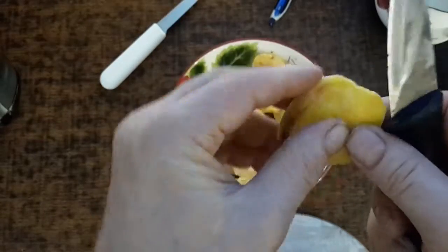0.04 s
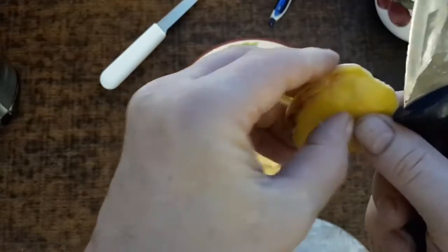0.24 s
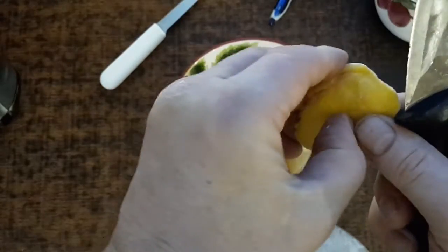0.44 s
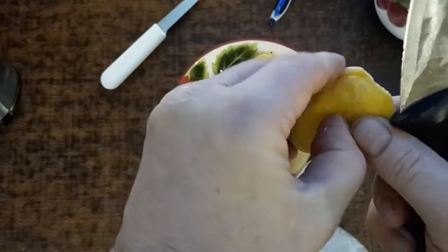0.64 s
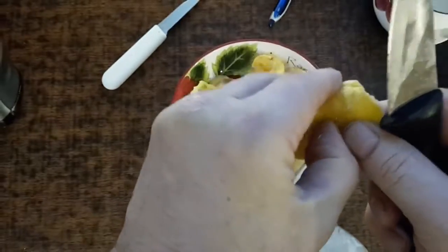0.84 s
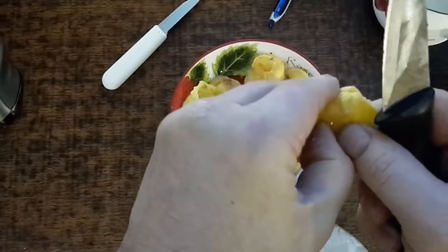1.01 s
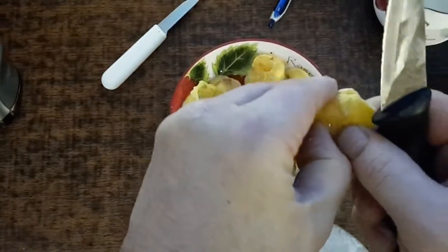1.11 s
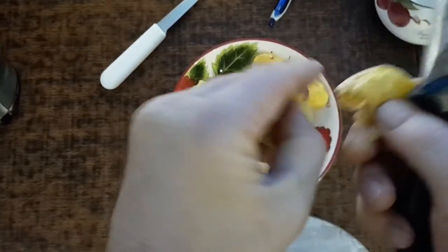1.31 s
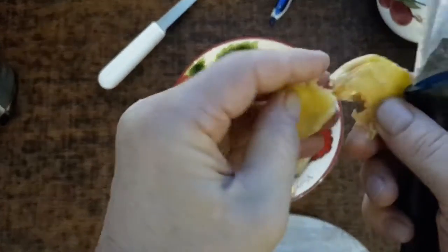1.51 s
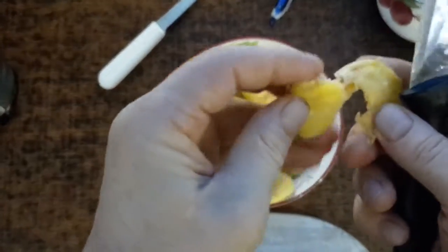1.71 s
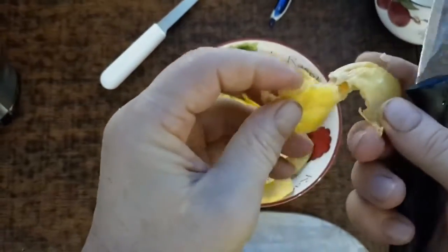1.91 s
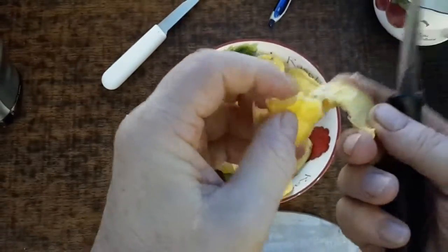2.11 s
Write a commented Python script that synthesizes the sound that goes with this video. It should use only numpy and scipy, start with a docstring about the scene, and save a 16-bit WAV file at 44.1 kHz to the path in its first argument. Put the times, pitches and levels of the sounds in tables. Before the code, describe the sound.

A thick crisp chip is broken by hand close to a phone microphone in a small hard room: faint ticks, then dense sharp crackling and loud snaps, thinning to soft sparse clicks over a quiet low drone.

```python
"""A thick fried chip is bent and broken by hand close to a phone, over a table in a hard small room.
Throughout, filtered noise makes the air and a low, wavering drone, perhaps an appliance. A few faint breaks
lead to dense snapping from 0.2 s, loudest near 0.9 and 1.3 s, then sparser and softer after 1.5 s.
Each fracture is a sub-millisecond burst of pushes into damped rings; tiny cracks patter between them,
and the table and walls answer as sparse reflections and a decaying noise tail."""
import sys
import numpy as np
from scipy import signal
from scipy.fft import rfft, irfft, next_fast_len
from scipy.io import wavfile

SR = 44100
rng = np.random.default_rng(int(sys.argv[2]) if len(sys.argv) > 2 else 0)


def attenuation_scalar(level_db):
    """Turn a level in dB into a linear amplitude multiplier (20 dB per decade)."""
    decades = np.asarray(level_db, float) / 20
    return 10 ** decades


def int16_out(signal):
    """Quantize to a 16-bit WAV file."""
    q = np.round(np.clip(np.atleast_2d(signal).T, -1, 1) * 32767)
    wavfile.write(sys.argv[1], SR, q.astype(np.int16))


N = 94815  # samples


def unit(x):
    """Normalisation by the root mean square, to rms 1."""
    return x / np.sqrt(np.mean(x ** 2) + 1e-20)


def along(points, hz):
    """Linear interpolation of (frequency [Hz], value) points on a logarithmic frequency axis."""
    f, v = np.transpose(points)
    return np.interp(np.log(hz + 1), np.log(f + 1), v)


def filtered(x, response):
    """Linear filtering: the spectrum of x times a complex frequency response."""
    m = next_fast_len(N + SR // 4)
    spectrum = rfft(x, m) * response(np.fft.rfftfreq(m, 1 / SR))
    return irfft(spectrum, m)[..., :N]


def peak(f, hz, width):
    """Frequency response of a damped second-order resonator, with gain 1 at resonance."""
    return 1j * f * width / (hz * hz - f * f + 1j * f * width)


def room_tone():
    """Shaped noise with frequency-dependent coherence, and narrowband noise whose envelope wavers."""
    # spectrum of the air: (frequency [Hz], relative density [dB])
    air_shape = [(18, -37), (30, -20.5), (128, -2), (340, -4.5), (641, -12), (953, -7.5), (1800, -21),
                 (2340, -27), (2530, -24.5), (4900, -57), (7670, -36), (12700, -34), (15200, -36),
                 (16500, -48)]
    # left-right coherence of the air: (frequency [Hz], coherence [1])
    likeness = [(25, .85), (60, 1), (130, 0.87), (290, 0.83), (640, 0.5), (1410, 0.16), (3100, 0.16),
                (6820, 0.11), (15000, 0.02)]
    # resonances of the drone: (frequency [Hz], width of one of two passes [Hz], level before panning [dB])
    drone_bands = [(85.4, 16, -55.5), (125.5, 22.3, -50), (381.6, 82, -56)]
    air_db, pan_db = -48, 2  # air rms before panning; left over right

    def mid_side(hz):
        # cos^2 - sin^2 of half the angle gives the coherence
        angle = np.arccos(np.clip(along(likeness, hz), -1, 1)) / 2
        return attenuation_scalar(along(air_shape, hz)) * [np.cos(angle), np.sin(angle)]

    mid, side = filtered(rng.standard_normal((2, N)), mid_side)
    air = attenuation_scalar(air_db) * unit(np.array([mid + side, mid - side]))
    drone = 0
    for hz, width, db in drone_bands:
        band = filtered(rng.standard_normal(N), lambda f: peak(f, hz, width) ** 2)
        drone = drone + attenuation_scalar(db) * unit(band)
    return (air + drone) * attenuation_scalar([[pan_db / 2], [-pan_db / 2]])


def echoes(x):
    """Reverberation: sparse early reflections and an exponentially decaying diffuse tail."""
    # reverberation time of the room: (frequency [Hz], time to fall 60 dB [s])
    room_t60 = [(1000, 0.049), (2600, 0.29), (7000, 0.3), (15000, 0.22)]
    room_db = -1
    # first answers from hands, bowl and table top: level, reflections per second, decay time [s]
    table_db, table_per_s, table_t60 = -5.5, 1500, 0.026
    delay, step = 30, SR // 12  # samples
    out = np.zeros((2, N + SR))
    for start in range(0, N, step):  # new reflections for each stretch of time
        hz, t, z = signal.stft(rng.standard_normal((2, SR // 3)), SR, nperseg=256)
        decay = attenuation_scalar(-60 * t / along(room_t60, hz)[:, None])
        tail = signal.istft(z * decay, SR, nperseg=256)[1]
        seconds = np.arange(tail.shape[1]) / SR
        sparse = rng.random(tail.shape) < table_per_s / SR
        near = rng.standard_normal(tail.shape) * sparse * attenuation_scalar(-60 * seconds / table_t60)
        response = attenuation_scalar(room_db) * tail / np.linalg.norm(tail[0])
        response = response + attenuation_scalar(table_db) * near / np.linalg.norm(near[0])
        wet = signal.fftconvolve(x[None, start:start + step], response, axes=1)
        out[:, start + delay:start + delay + wet.shape[1]] += wet
    return out[:, :N]


def snaps(times, levels_db, size):
    """Impulsive excitation of damped modes. Rows: left, right, and the even sound sent into the room."""
    # modes: (mean frequency [Hz], width [Hz], relative level [dB])
    # in order: sharp ring, dull body, hollow, shell, thin flakes, lower dull body
    modes = [(8800, 3050, 13.5), (1490, 670, 17), (2590, 794, 15.5), (4480, 2680, 14), (12140, 5500, 17.5),
             (985, 570, 8)]
    snap_s, ragged = 0.0005, 0.35  # decay constant of the pushes; later pushes beside the first
    scatter = 0.05  # spread of each mode's log frequency from break to break
    pan_db, pan_spread_db, lag_spread_s = 1.2, 2.5, 0.00001  # left-right differences
    t = np.arange(size) / SR
    # columns: 6 frequencies, 6 signs, lag, pan, then the pushes
    draw = rng.standard_normal((len(times), 14 + size))
    levels_db = np.column_stack([levels_db, levels_db[:, 1]])  # last mode follows the dull body
    push = (t == 0) + ragged * draw[:, 14:] * np.exp(-t / snap_s)
    even = rough = 0
    for k, (hz, width, db) in enumerate(modes):
        grow = np.pi * width * t
        pitch = hz * np.exp(scatter * draw[:, [k]])
        ring = grow * np.exp(-grow) * np.sin(2 * np.pi * pitch * t)
        ring = ring * np.sign(draw[:, [6 + k]]) * attenuation_scalar(levels_db[:, [k]] + db)
        pushed = signal.fftconvolve(ring, push, axes=1)[:, :size]
        same_energy = np.linalg.norm(ring, axis=1) / np.linalg.norm(pushed, axis=1)
        even = even + ring
        rough = rough + pushed * same_energy[:, None]
    out = []
    for side, wave in ((0.5, rough), (-0.5, rough), (0, even)):
        onset = np.round((times + side * lag_spread_s * draw[:, 12]) * SR).astype(int)
        at = onset[:, None] + np.arange(size)
        gain = attenuation_scalar(side * (pan_db + pan_spread_db * draw[:, [13]]))
        # samples past the end collect in one extra bin, which is dropped
        out.append(np.bincount(np.clip(at, 0, N).ravel(), (gain * wave).ravel(), N + 1)[:N])
    return np.array(out)


def crumbling():
    """Random point process of tiny cracks, whose level jumps up and decays exponentially in runs."""
    # patter of tiny cracks under the fingers, faint at first, swelling, then fading:
    # (time [s], relative level [dB])
    patter = [(0.0, -68), (0.21, -76), (0.42, -43.5), (0.68, -46), (1.2, -46), (1.47, -48), (2.02, -62.5),
              (2.15, -57)]
    # dying runs: (start [s], relative level [dB], time to fall 60 dB [s], boost of dull rings [dB])
    dying_runs = [(0, -58, 0.098, 12.5), (.137, -58, .16, -3), (.238, -36.5, 0.39, 4),
                  (.275, -38.5, 0.59, -0.5), (0.33, -36, 0.26, 10), (.421, -37, 0.066, -8),
                  (.477, -57, .075, -10), (.55, -55, .13, -10), (.629, -25, .21, 3.5), (.756, -42, 0.17, 1),
                  (.794, -36, .38, -6), (.864, -21.5, 0.089, 6), (.904, -18.5, 0.23, -2.5),
                  (.937, -33.5, 0.31, 4), (1.029, -27, 0.15, -2.5), (1.078, -33, 0.16, -10),
                  (1.124, -16.5, 0.064, -8.5), (1.15, -27, 0.13, -11), (1.207, -25.5, 0.057, 2),
                  (1.327, -23.5, 0.17, 2), (1.356, -23, 0.12, 0.5), (1.654, -47, 0.058, 0),
                  (1.72, -48, 0.12, 0), (1.855, -56, .083, -10)]
    # relative levels of the rings [dB]: sharp ring, dull body, hollow, shell, thin flakes
    tiny_mix_db = [6.5, -26.5, -15, -2, -2]
    per_s = 450
    spread_db, largest = 5.5, 1.47  # largest crack, in spreads over the smallest
    draw = rng.random((int(per_s * N / SR), 2))
    times = draw[:, 0] * N / SR
    runs = np.array([(times > start) * attenuation_scalar(db - 60 * np.abs(times - start) / t60)
                     for start, db, t60, _ in dying_runs])
    strength = attenuation_scalar(np.interp(times, *np.transpose(patter))) + runs.sum(0)
    dull_db = np.array(dying_runs)[:, 3] @ runs / strength  # weighted by each run's share
    spreads = np.minimum(-np.log(1 - draw[:, 1]), largest)  # exponential distribution, capped
    db = 20 * np.log10(strength) + spread_db * (spreads - 2)
    levels_db = db[:, None] + tiny_mix_db + dull_db[:, None] * [0, 1, 1, 1, 0]
    return snaps(times, levels_db, size=160)


def fractures():
    """Brittle fracture: each break that stands out excites the modes in its own proportions."""
    # breaks: (time [s], sharp ring relative level [dB], then over the sharp ring:
    # dull body [dB], hollow [dB], shell [dB], thin flakes [dB])
    cracks = [(0.0764, -56, 1.5, -6, -19, -8), (0.1128, -44, -26, -37, -26, -2),
              (0.1382, -40.5, -29, -19, -13, 2.5), (0.1412, -52, -20, -25, -17, -2),
              (0.1708, -43, -26, -22, -12, -3), (0.2266, -43, -12, -21, -8, 2),
              (0.2317, -34, -30, -26, -18, 8), (0.238, -22.5, -24, -17, -20, 0),
              (0.2457, -29, -21, -22, -21, 1), (0.2492, -21, -13, -28, -19, -9),
              (0.2555, -19, -21, -21, -23, 3), (0.2746, -23.5, -17, -22, -26, 2),
              (0.284, -30.5, -10.5, -14, -11, 6), (0.2908, -28, -10, -15, 0, 3),
              (0.2943, -18, -16.5, -13.5, -11.5, -2), (0.3293, -23, -15, -7, 6, 1.5),
              (0.341, -34, -18, -13, 0, 0), (0.351, -42.5, -10, -13, 12, -1),
              (0.3755, -28.5, -15, -8, 2, 3), (0.4186, -38, -11, -10, -1, 5),
              (0.4232, -16, -36, -28, -8, -7.5), (0.4278, -23.5, -36, -32, -10, -2),
              (0.4773, -33.5, -39, -34, -23, 12), (0.5148, -42, -21, -22, -14, 9),
              (0.5317, -25, -22, -15.5, -4.5, 0), (0.5514, -30, -36, -34, -29, 7.5),
              (0.5801, -23, -39, -30, 1, -3), (0.5982, -28.5, -31, -27, -18, 4.5),
              (0.621, -25.5, -27, -13, -9, -5), (0.6299, -21, -23, -13.5, -12, -4),
              (0.6313, -23.5, -25, -14, -12, -5), (0.6395, -29, -19, -13, -5, 1),
              (0.6416, -22, -19, -10, -9, -4), (0.689, -28.5, -20, -16, -10, -3),
              (0.7425, -37, -33, -24, -25, -6), (0.7545, -23, -27, -15.5, -8, 1),
              (0.7572, -27, -26, -9.5, -11, -5), (0.7926, -21.5, -5.5, -9.5, -2.5, -4),
              (0.7973, -23.5, -19, -14, -26, -6), (0.8173, -26, -19, -8, -21, -2),
              (0.8543, -30.5, -14, -15, 2, -4), (0.8622, -31.5, -25, -11, -8, 3),
              (0.8652, -17.5, -26, -13, -11, -6), (0.8744, -28.5, -33, -6, -1, -5),
              (0.9053, -13, -13, -12, -4, -3.5), (0.9103, -8.5, -26, -24, -15, -4),
              (0.9182, -23, -38, -33, -4, -13), (0.9268, -28.5, -30, -26, 4.5, -5),
              (0.937, -16, -32, -23, -6, -14), (0.941, -18, -30, -31, -4.5, -0.5),
              (0.9785, -29, -34, -20, 1, -9), (1.0166, -20.5, -40, -23, -8, -2),
              (1.0284, -28.5, -30, -25, 0, 4), (1.03, -21, -39, -34, -3.5, 0.5),
              (1.038, -17.5, -37, -41, -3, -12), (1.0512, -23.5, -38, -33, -11, 3.5),
              (1.0783, -18.5, -42, -43, -12, 2), (1.1115, -25, -31, -33, -13, -7),
              (1.1194, -22, -37, -26, -13, -13), (1.1222, -19.5, -19.5, -13.5, -2, 3),
              (1.1285, -21.5, -41, -25, -10, -5), (1.1311, -14, -41, -33, -9.5, -4),
              (1.1392, -41, -32, -28, -14, -10), (1.148, -28, -34, -26, -18, 5),
              (1.1742, -32, -33, -18, 1, 1), (1.2046, -25, -38, -29, -10, 7),
              (1.2064, -18, -41, -34, -6, -9), (1.2152, -26, -40, -33, -23, -6),
              (1.2198, -20, -26, -24, -3.5, -9), (1.2453, -19, -37, -33, -7, -3.5),
              (1.2554, -15, -46, -45, -14.5, -18), (1.277, -34, -38, -35, -24, 1),
              (1.288, -26, -46, -38, -26, 1), (1.2959, -18.5, -32, -20, -12, 2),
              (1.3041, -8.5, -36, -28, -7.5, -11.5), (1.314, -16, -51, -36, -19, -9),
              (1.3246, -12, -36, -22, -16, -12), (1.3272, -17, -27.5, -18, -9, -10),
              (1.3313, -8.5, -37, -26, -7.5, -11), (1.3409, -25, -35, -24, -15, -13),
              (1.3601, -19, -23, -34, -22, -14), (1.3663, -21, -22, -19, -15, -2),
              (1.3941, -24, -28, -32, -17, 0), (1.4312, -28.5, -38, -37, -1.5, -1),
              (1.5181, -27, -27, -20.5, -13, -5), (1.523, -37, -20, -24, -7.5, -7),
              (1.5618, -31, -31, -28, -13.5, -16), (1.5659, -28.5, -27, -37, -19, -13),
              (1.573, -45, -29, -21, -10, -2), (1.591, -42, -24, -35, -21, -13),
              (1.6104, -49, -6, -2, -15, -7), (1.614, -42, -24, -23, -15, 2),
              (1.6208, -35, -32, -16.5, -21, -7), (1.6253, -31.5, -30, -25, -15, -12),
              (1.6392, -42, -21, -29, -19, -8), (1.6465, -36, -27, -27, -14, -12),
              (1.654, -32, -12, -28, -11.5, -2), (1.7124, -32, -24, -20, -13, 2.5),
              (1.722, -32.5, -24, -25, -22, 2), (1.747, -32.5, -31, -37, -23, -19),
              (1.7605, -39.5, -26, -31, -11, -17), (1.8226, -52, -8, -16, -18, -5),
              (1.8622, -38.5, -19, -29, -22, -24), (1.9231, -57, 3, 10.5, -10, -8),
              (1.9274, -31, -25, -26, -16, -14), (1.9303, -38, -27, -31, -23, -23),
              (1.974, -43, -23, -26, -8, -8), (2.0003, -46, -22, -14, -12, -7),
              (2.0475, -31.5, -34, -38, -6, -7), (2.0506, -44.5, -34, -41, -22, -5),
              (2.096, -51, -17, -22, -6, 1), (2.134, -60, -10, -23, -7, -14)]
    rows = np.array(cracks)
    levels_db = rows[:, [1]] + rows[:, 1:] * [0, 1, 1, 1, 1]
    return snaps(rows[:, 0], levels_db, size=256)


def scene():
    """Superposition of the chip, its reflections and the room; a small shell radiates bass weakly."""
    thin_hz = 860  # corner of each of two first-order high-pass stages
    breaks = fractures() + crumbling()
    chip = filtered(breaks, lambda f: (1j * f / (thin_hz + 1j * f)) ** 2)
    return chip[:2] + echoes(chip[2]) + room_tone()


def roll_off(x):
    """The treble ends steeply here."""
    return signal.sosfilt(signal.butter(12, 16980, fs=SR, output="sos"), x)


def record(dry):
    """Band limitation in the phone: a low-pass whose gain falls linearly to zero over 300 Hz."""
    top_hz = 16100  # middle of the slope
    mix = filtered(dry, lambda hz: np.clip((top_hz + 150 - hz) / 300, 0, 1))
    return roll_off(mix)


dry = scene()
out = record(dry)
int16_out(out)
```